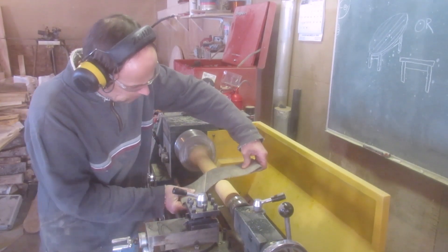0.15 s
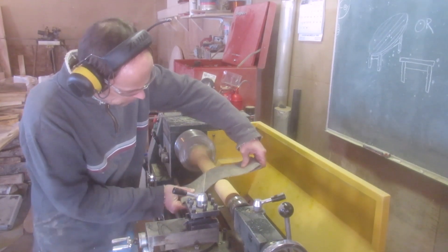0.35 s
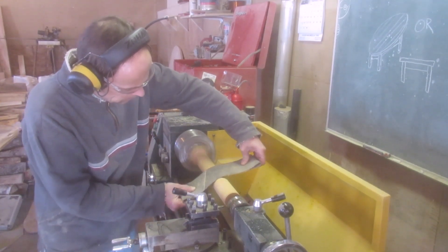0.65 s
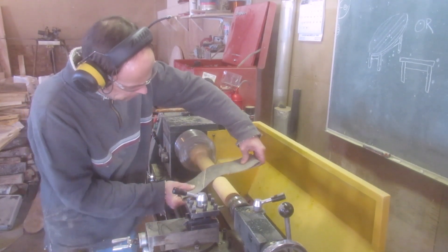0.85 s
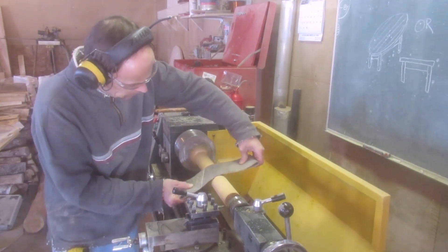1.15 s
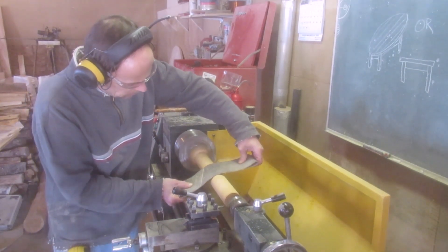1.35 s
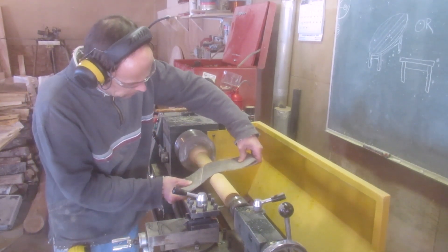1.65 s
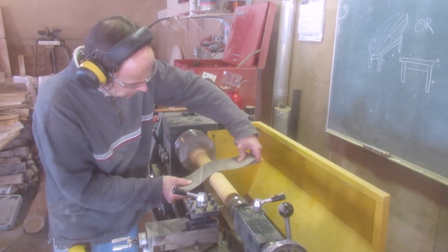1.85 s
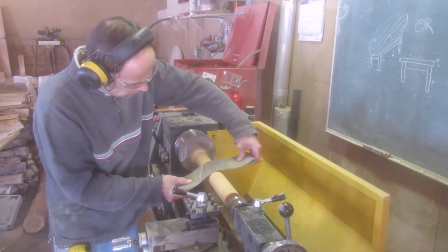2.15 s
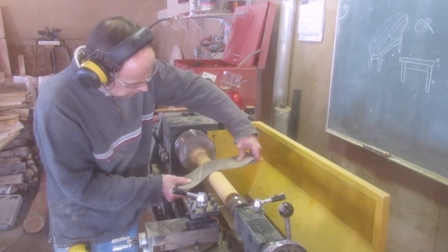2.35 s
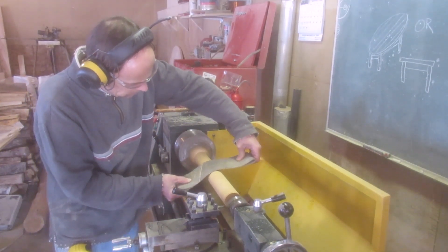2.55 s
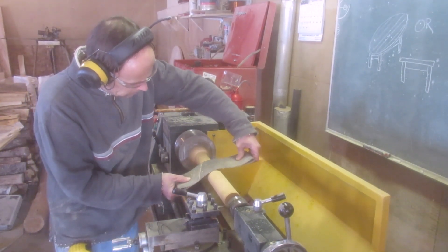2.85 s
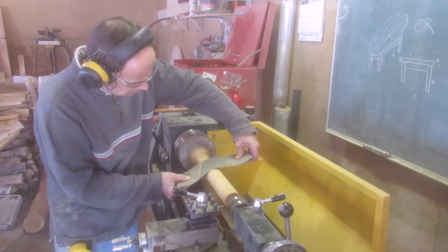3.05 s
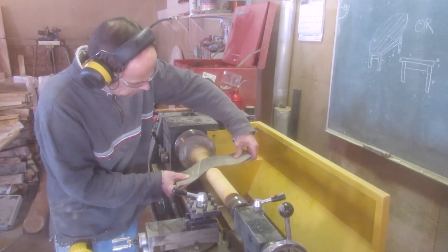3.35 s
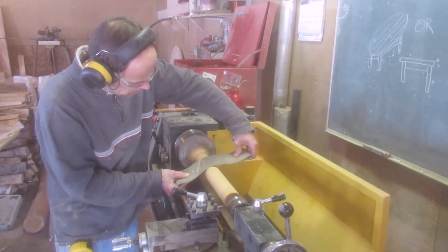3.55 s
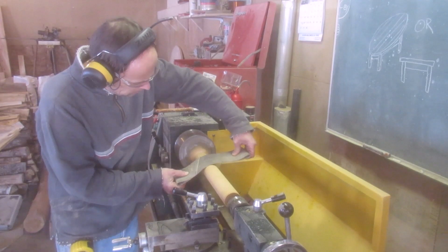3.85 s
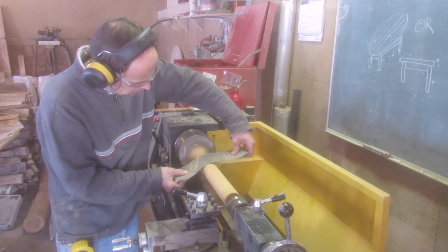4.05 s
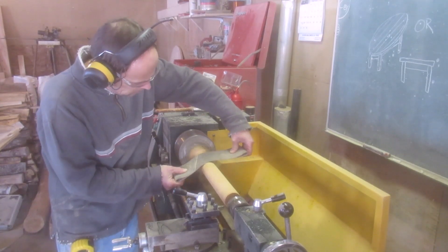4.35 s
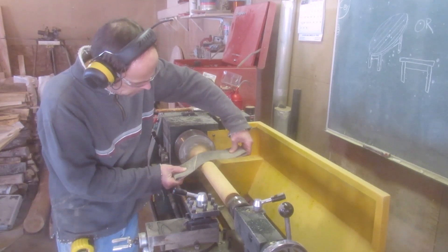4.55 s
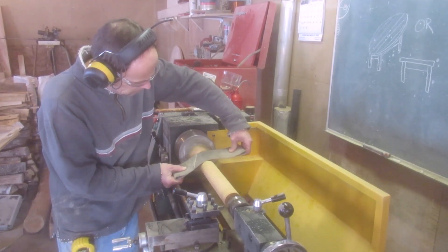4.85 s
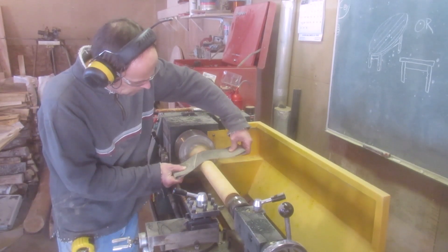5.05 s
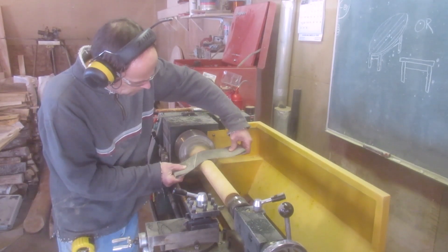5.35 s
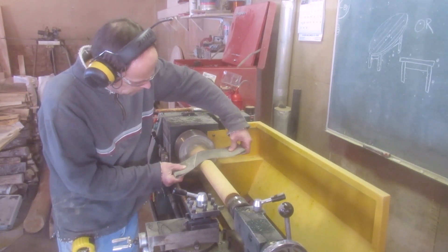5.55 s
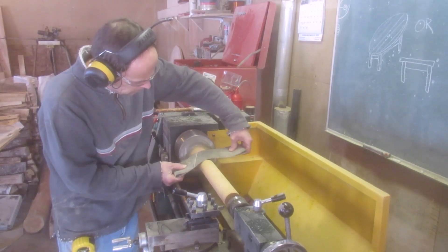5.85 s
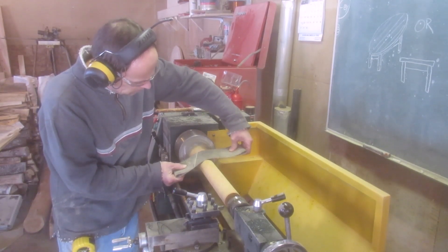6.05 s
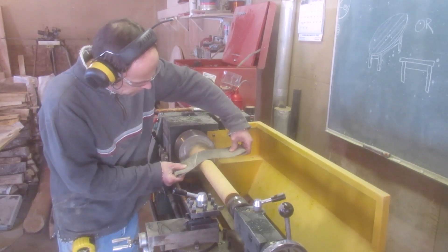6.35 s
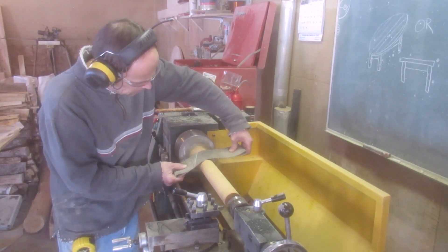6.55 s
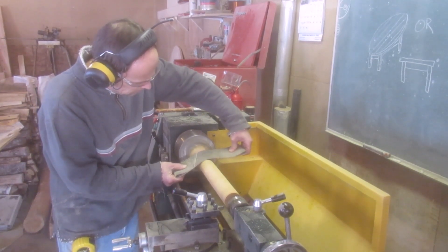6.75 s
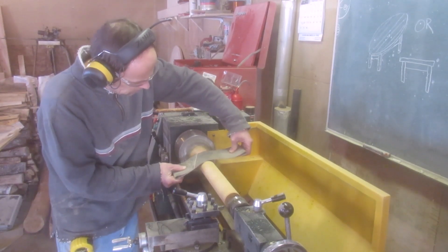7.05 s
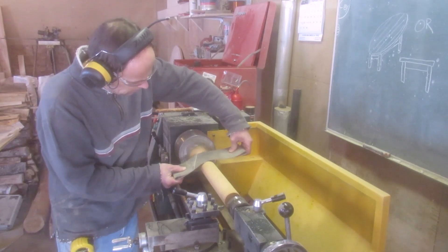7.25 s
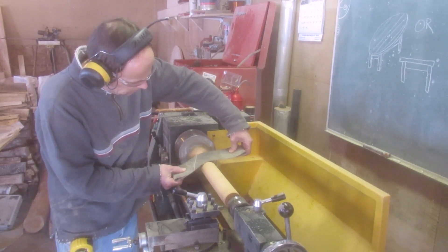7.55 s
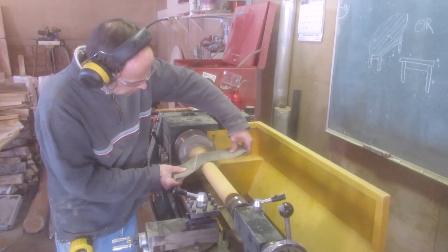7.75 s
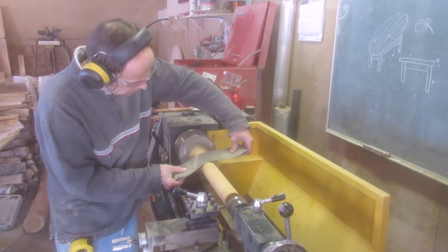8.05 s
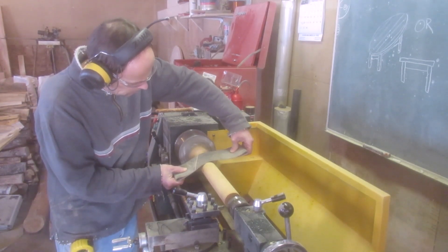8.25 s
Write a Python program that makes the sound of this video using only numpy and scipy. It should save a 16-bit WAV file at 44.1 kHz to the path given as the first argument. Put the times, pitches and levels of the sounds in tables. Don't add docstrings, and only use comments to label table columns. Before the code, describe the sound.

Steady lathe noise and sanding hiss fill the whole stretch without starting or stopping. Low electrical hum, gear whirr and rotor whine stand as fixed tones in a rough rumble; gritty cloth scours the turning dowel, with narrow woody and metallic resonances drifting through. The rapid throb deepens later. Close, centred mono pickup in a small workshop, with slight gain pumping and brief coarse glitches.

```python
import sys
import numpy as np
from scipy import signal
from scipy.fft import rfft, irfft, dct
from scipy.io import wavfile
from scipy.ndimage import uniform_filter1d

SR = 44100
rng = np.random.default_rng(int(sys.argv[2]) if len(sys.argv) > 2 else 0)


def dump(signal):
    limited = np.clip(np.atleast_2d(signal).T, -1, 1)
    pcm = np.round(limited * 32767).astype(np.int16)
    wavfile.write(sys.argv[1], SR, pcm)


def gain_from_db(level_db):
    decades = np.asarray(level_db, float) / 20
    return 10 ** decades


N = 371322

SPINDLE_HZ, FIRST_SLIP_S = 13.52, .001
MAINS_HZ, ROTOR_HZ, BELT_HZ, MESH_HZ = 120, 29.67, 8.1, 469.4
MAINS_DB = [-58.5, -36.5, -47, -46.5]
HUM_SIDE_HZ = [-ROTOR_HZ, -2 * BELT_HZ, -BELT_HZ, -4 * BELT_HZ, SPINDLE_HZ, 2 * BELT_HZ, 3 * BELT_HZ]
HUM_SIDE_DB = [-54, -59, -61, -62, -61, -56, -62]
MESH_SIDE_HZ = [0, -32.5, -31.5, -23.6, -13.5, -8.1, 8.1, 31.5, 32.4, 469.2]
MESH_SIDE_DB = [-30, -50, -50, -42, -49, -50, -49, -50, -48, -48]
MESH_EARLY_DB, MESH_SETTLE_S = -3, 1.9
SHAFT_HZ = [88.5, 104.5, 136.5, 149.5, 160.5, 325.5, 380.7, 389.4, 413.8, 533.5, 556.8, 589.3, 638.9,
            1273.2]
SHAFT_DB = [-70, -68, -76, -68, -66.5, -57.5, -50.5, -60, -50, -50, -46.5, -50.5, -47, -51.5]
SLOT_HZ = [1513.2, 1922.5, 2038.1, 2149.8, 2261.7, 2269.7, 2389.8, 3026.4, 3146.4, 4979.4]
SLOT_DB = [-41, -42, -42.5, -45, -41, -39, -36, -32, -47, -50]
# f/Hz, level/dB per Hz
RUMBLE = [(25, -42), (60, -43), (90, -23), (190, -23), (215, -7), (300, -11), (420, -7.5), (460, 10.5),
          (520, -8), (640, -7), (760, -12.5), (940, 0), (1100, -21.5), (1600, -19.5)]
RUMBLE_DB = -34.5

# f/Hz, level/dB per Hz
RUB = [(600, -15), (1000, -14), (1470, -7.5), (1680, -7), (2330, 0), (2860, -2.5), (3090, -3), (3540, -7),
       (4240, -8), (4970, -7.5), (6900, -8.5), (10700, -17.5), (14900, -30.5)]
# f/Hz, depth/dB
RIPPLE = [(1000, 2.6), (3000, 3.0), (5000, 2.9), (10000, 2.2)]
# f/Hz, width/Hz, level/dB, from t/s, to t/s
RUB_MODES = [(640, 28, 16, .6, 1.05), (785, 35, 13, 4.7, 5.4), (870, 35, 10, 4.9, 5.6),
             (915, 40, 12, 5.7, 6.9), (1010, 35, 7, 5.8, 6.8), (1330, 40, 7, 5.6, 6.9),
             (640, 30, 12, 4.7, 5.4), (930, 80, 6, 0, 3.6), (1200, 50, 6, 1.2, 3), (1330, 50, 5, 0, .6),
             (1420, 50, 4, 2.3, 4.2), (1500, 70, 5, 2.6, 3.8),
             (1754, 54, 6, 0.1, 3.3), (1890, 63, 7, 4.1, 4.8), (1890, 70, 6.5, 6, 7.65),
               (2243, 90, 4.5, 0, 3.3), (2295, 130, 6, 5, 7.2), (2430, 66, 5, 2.5, 4.5),
               (2400, 87, 9, 8, 8.47), (2695, 73, 5.5, 0.5, 3.3), (2760, 60, 4.5, 3.5, 8),
               (3010, 70, 3, 6.5, 6.9), (3220, 81, 5.5, 6.5, 6.9), (3015, 90, 3, 1, 7.7),
             (3820, 60, 6, 0.5, 2.7), (4600, 76, 6.5, 17, 9.9), (4660, 60, -2, -3, 3.2),
               (4900, 72, 10, 0.5, 0.62), (4930, 60, 6, 5, 7.2), (5200, 50, 3.5, 5.5, 8),
               (5493, 73, 5.5, 3, 8.5), (6140, 70, 3, 0.3, 3.5), (6660, 56, 5, 3.3, 7.7),
               (7400, 70, 4, 7, 8.2), (7370, 81, 3, 6, 6.8)]
# t/s, pressure level/dB, bite of the grit level/dB
CLOTH = [(0, -19, 0.5), (.55, -18.5, -0.3), (1.0, -18, -0.2), (1.35, -18.5, -1.6), (1.65, -19.5, -0.1),
         (2.2, -19, 0.5), (2.6, -18, -0.5), (3.1, -18.5, 0.9), (3.7, -18.5, 0.2), (4.35, -18, -.7),
         (5.0, -19, 1), (5.6, -19.5, 1.5), (6.05, -18.5, 2), (6.8, -19.5, 2.5), (6.9, -21, 0.8),
         (7.3, -19.7, 0), (7.95, -19, -0.5), (8.42, -20, 0.5)]
# t/s, throb level/dB
THROB = [(0, .5), (1.4, .4), (2.2, 1.1), (3.2, .7), (3.8, 1.3), (4.5, 1.4), (5, .9), (5.4, 1.4), (6.2, 2),
         (6.8, 1.5), (7.1, .6), (7.8, 1.4), (8.42, .7)]
# f/Hz, share
THROB_SHARE = [(1200, .5), (2500, .65), (5000, 1.15), (12000, .9)]
# f/Hz, share
GRIT_SHARE = [(3300, 0), (3900, 1), (7000, 1), (9000, 0)]
# f/Hz, share
DUST_SHARE = [(7000, 0), (9000, 1)]
# f/Hz, depth/dB
SNAGS = [(1500, 0.19), (4000, 0.41), (9000, 0.45)]
FRESH_DUST_DB, CLOG_S, DUST_PER_PRESSURE = 0.3, 0.64, -0.19

# t/s, gain drop level/dB
DUCKS = [(.25, .8), (.772, .9), (.946, 1.7), (2.342, 2.6), (2.84, 1.6), (3.752, 3.5), (4.15, .7),
         (4.43, 2.4), (5.085, .7), (5.662, 1.1), (6.045, 2.2), (6.624, 1.9), (6.86, 1.2), (7.513, .9)]
DUCK_FALL_S, DUCK_RECOVER_S, OPEN_GAIN_DB = 0.0078, 0.45, 1.33
# t/s, from f/Hz, to f/Hz
SWAPPED = [
    (1.141, 5150, 6250),
    (1.141, 10300, 12400),
    (1.373, 9650, 11000),
    (1.838, 11700, 13050),
    (1.838, 14450, 15000),
    (3.58, 10300, 13800),
]
COARSE_S = [2.212, 2.381, 3.535, 6.264]
# f/Hz, step in times the block rms
COARSE_STEP = [(300, 2.5), (1000, 4), (2500, 8.5), (4500, 6.2), (7000, 4.2)]


def evened(x):
    return x / np.sqrt(np.mean(x ** 2) + 1e-20)


def read(points, hz):
    f, value = np.transpose(points)
    return np.interp(np.log(hz + 1), np.log(f + 1), value)


def curve(rows, t):
    s, *columns = np.transpose(rows)
    return [np.interp(t, s, c) for c in columns]


def wander(top_hz):
    z = rfft(rng.standard_normal(N))
    return evened(irfft(z * np.exp(-(np.fft.rfftfreq(N, 1 / SR) / top_hz) ** 2), N))


def patches(shape, bins, frames):
    field = rng.standard_normal(shape[::-1]).T
    return evened(uniform_filter1d(uniform_filter1d(field, bins, 0), frames, 1))


def shaped_noise(field_db, size):
    a, b = rng.standard_normal(field_db.shape[::-1] + (2,)).T
    spectra = (a + 1j * b) * gain_from_db(field_db)
    return evened(signal.istft(spectra, nperseg=size, noverlap=size * 3 // 4)[1][:N])


def tones(hz, db, waver, drift_turns):
    t, out = np.arange(N) / SR, np.zeros(N)
    level = 1 + waver * wander(3.1)
    drift = drift_turns * wander(0.52)
    for f, d, (start, shift) in zip(hz, db, rng.random((len(hz), 2))):
        lag = int(shift * N)
        turns = f * t + start + np.roll(drift, lag)
        sine = np.sin((2 * np.pi * (turns % 1)).astype(np.float32))
        out += np.sqrt(2) * gain_from_db(d) * np.roll(level, lag) * sine
    return out


def resonate(x, hz, width_hz):
    return irfft(rfft(x) * (abs(np.fft.rfftfreq(N, 1 / SR) - hz) < width_hz / 2), N)


def drag(t):
    turn = 2 * np.pi * SPINDLE_HZ * (t - FIRST_SLIP_S)
    return -np.cos(turn) - .25 * np.cos(2 * turn) - .3 * np.cos(3 * turn)


def mains_hum():
    hum = tones(MAINS_HZ * np.arange(1, len(MAINS_DB) + 1), MAINS_DB, waver=0.025, drift_turns=0.0055)
    return hum + tones(2 * MAINS_HZ + np.array(HUM_SIDE_HZ), HUM_SIDE_DB, waver=.1, drift_turns=.03)


def mesh_slack():
    return 1 - gain_from_db(MESH_EARLY_DB * np.exp(-(np.arange(N) / SR / MESH_SETTLE_S) ** 2))


def gear_train():
    gears = tones(MESH_HZ + np.array(MESH_SIDE_HZ), MESH_SIDE_DB, waver=.06, drift_turns=.03)
    gears -= mesh_slack() * resonate(gears, MESH_HZ, width_hz=6)
    return gears + tones(SHAFT_HZ, SHAFT_DB, waver=0.31, drift_turns=0.096)


def rotor_whine():
    return tones(SLOT_HZ, SLOT_DB, waver=.12, drift_turns=.04)


def rumble():
    hz, t = np.fft.rfftfreq(4096, 1 / SR), np.arange(N // 1024 + 5) * 1024 / SR
    above_db = -18 * np.log2(np.maximum(hz / RUMBLE[-1][0], 1))
    field_db = (read(RUMBLE, hz) + above_db)[:, None]
    field_db = field_db + 2.8 * patches((len(hz), len(t)), bins=3, frames=30)
    swell = gain_from_db(RUMBLE_DB + 0.45 * drag(np.arange(N) / SR))
    return swell * shaped_noise(field_db, size=4096)


def machine():
    return mains_hum() + gear_train() + rotor_whine() + rumble()


def rubbing():
    hz, t = np.fft.rfftfreq(2048, 1 / SR), np.arange(N // 512 + 5) * 512 / SR
    colour_db = read(RUB, hz) - 7 * np.log2(np.maximum(RUB[0][0] / (hz + 1), 1))
    ripple = np.minimum(patches((len(hz), len(t)), bins=1, frames=260), 1.5)
    field_db = colour_db[:, None] + read(RIPPLE, hz)[:, None] * ripple
    field_db += .8 * patches(field_db.shape, bins=4, frames=60)
    for f, width, db, start, end in RUB_MODES:
        driven = (np.tanh((t - start) / 0.09) - np.tanh((t - end) / 0.17)) / 2
        peak = 1 / (1 + (2 * (hz - f) / width) ** 2)
        field_db += db * np.outer(peak, driven)
    return shaped_noise(field_db, size=2048)


def cloth():
    hz, t, z = signal.stft(rubbing(), SR, nperseg=256, noverlap=192)
    rub_db, grit_db = curve(CLOTH, t)
    dust_db = FRESH_DUST_DB * np.exp(-t / CLOG_S) + DUST_PER_PRESSURE * rub_db
    field_db = rub_db + np.outer(read(GRIT_SHARE, hz), grit_db - grit_db.mean())
    field_db += np.outer(read(DUST_SHARE, hz), dust_db - dust_db.mean())
    field_db += 0.49 * patches(z.shape, bins=5, frames=40)
    field_db += read(SNAGS, hz)[:, None] * patches(z.shape, bins=60, frames=9)
    field_db += np.outer(read(THROB_SHARE, hz), curve(THROB, t)[0] * drag(t))
    return gain_from_db(2.0) * signal.istft(z * gain_from_db(field_db), SR, nperseg=256, noverlap=192)[1][:N]


def scene():
    return np.tile(machine() + cloth(), (2, 1))


def gain_control():
    t, gain_db = np.arange(N) / SR, np.full(N, float(OPEN_GAIN_DB))
    for s, drop_db in DUCKS:
        since = np.maximum(t - s, 0)
        gain_db -= drop_db * np.minimum(since / DUCK_FALL_S, 1) * np.exp(-since / DUCK_RECOVER_S)
    return gain_from_db(gain_db)


def add(out, s, change, size):
    window = np.sin(np.pi * (np.arange(size) + .5) / size)
    block = out[:, round(s * SR) - size // 2:][:, :size]
    lines = dct(block * window, 4, norm="ortho")
    changed = change(lines, np.arange(size) * SR / 2 / size)
    block += window * dct(changed, 4, norm="ortho")


def swap_band(low, high):
    def change(lines, hz):
        inside = (hz > low) & (hz < high)
        return -3.2 * lines * inside * (rng.random(lines.shape) < .5)
    return change


def coarsen(lines, hz):
    step = np.sqrt(np.mean(lines ** 2)) * read(COARSE_STEP, hz)
    return .88 * (1.15 * step * np.round(lines / step) - lines)


def band_limit(x):
    return signal.sosfilt(signal.butter(12, 15020, fs=SR, output="sos"), x)


def record(dry):
    out = dry * gain_control()
    for s in COARSE_S:
        add(out, s, coarsen, size=1700)
    for s, low, high in SWAPPED:
        add(out, s, swap_band(low, high), size=1700)
    return band_limit(out)


dry = scene()
out = record(dry)
dump(out)
```